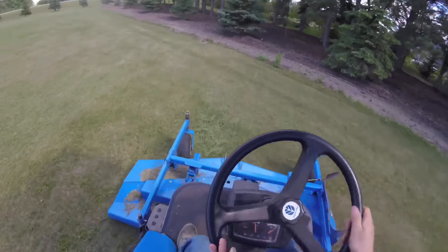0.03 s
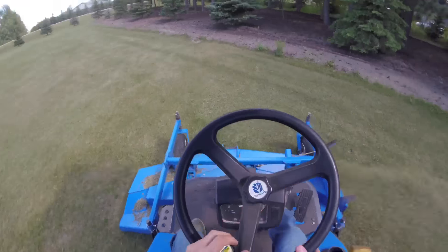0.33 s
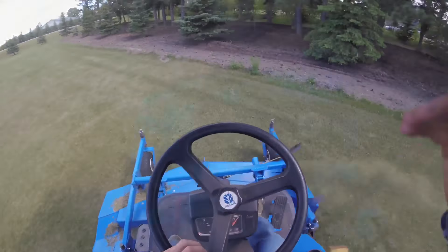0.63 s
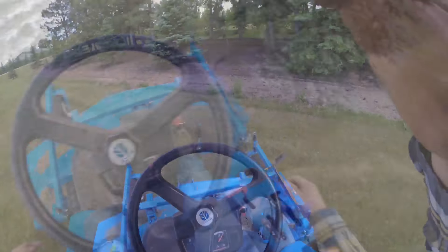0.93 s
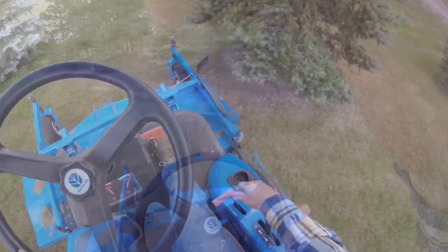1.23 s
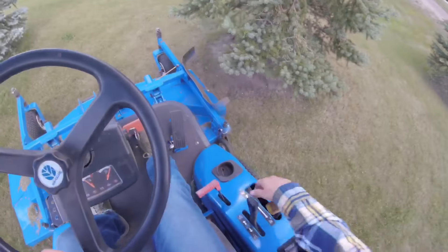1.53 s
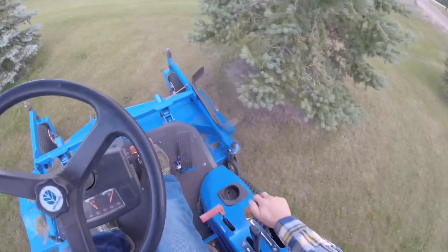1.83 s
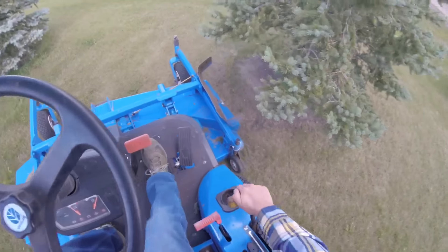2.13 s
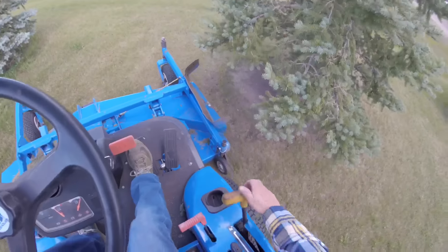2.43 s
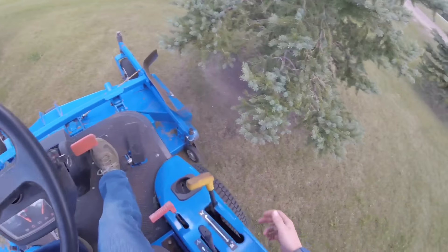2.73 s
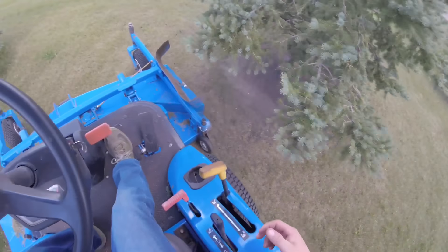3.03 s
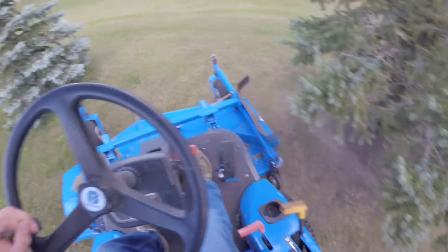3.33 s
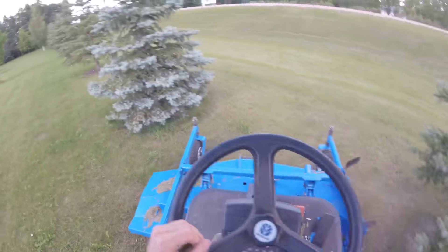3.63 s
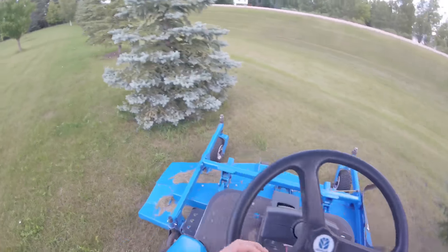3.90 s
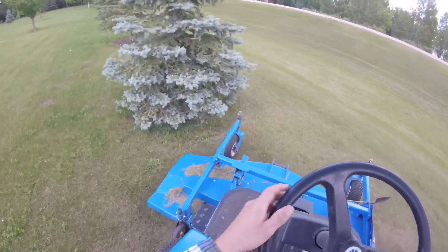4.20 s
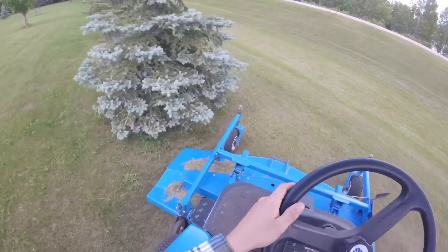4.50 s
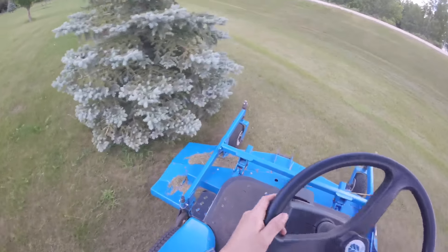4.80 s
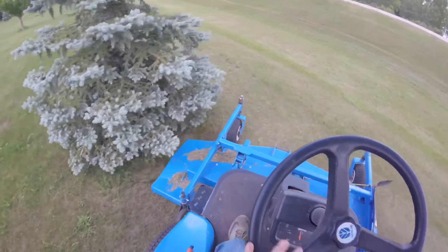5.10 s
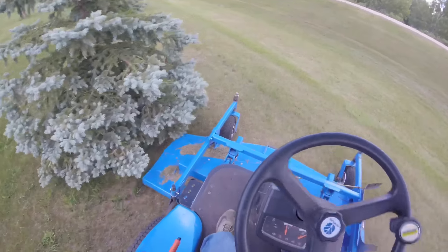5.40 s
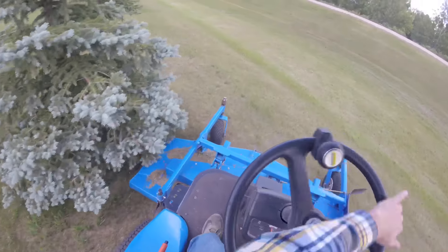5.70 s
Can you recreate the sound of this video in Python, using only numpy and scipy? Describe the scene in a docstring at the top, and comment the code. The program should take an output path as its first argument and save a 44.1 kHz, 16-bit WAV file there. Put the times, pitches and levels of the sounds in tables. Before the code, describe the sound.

A riding mower runs throughout, heard close from the seat outdoors: a low engine drone with clatter, rumble and humming blades. At first grass swishes lightly and a loose guard rattles. A short dry rasp swells near 0.9 seconds, followed by a small metal tick. The blade sound fades out by about 1.5 seconds, leaving the engine running free, boomier and closer. A metal lever clacks at about 1.9 seconds and again, louder, at 2.2. The blades spin up with gear whine, grinding and a thin belt hiss while the engine sags and labours, reaching its lowest note around 2.6 seconds. Loose metal ticks near 3 seconds. By 3.6 seconds the engine is back at speed and drones steadily, the blade hums throbbing against each other. A light grass swish and rattle return from about 5.2 seconds.

```python
"""A three-cylinder riding mower drones and swishes through grass, heard from the seat.
The sound of the mowing deck (the pan that holds the blades) fades out and the engine runs free.
The rider leans over, a lever clacks, and the clutch drags three belt-driven blades up to speed,
so the engine sags, labours and recovers. Its firings make the boom and clatter. The blades turn at
slightly different speeds, so their hums throb against each other over the whine of the gearbox."""
import sys
import numpy as np
from scipy import signal
from scipy.fft import rfft, irfft, next_fast_len
from scipy.io import wavfile
from scipy.ndimage import map_coordinates

SR = 44100
rng = np.random.default_rng(int(sys.argv[2]) if len(sys.argv) > 2 else 0)


def waveform_to_disk(signal):
    """Save audio, clipped to [-1, 1], as 16-bit WAV at the path in sys.argv[1]."""
    frames = np.transpose(np.atleast_2d(signal))
    scaled = np.clip(frames, -1, 1) * 32767
    samples = np.round(scaled).astype(np.int16)
    wavfile.write(sys.argv[1], SR, samples)


N = 253575
ENGAGE_S = 1.97  # the clutch bites
# How fast the blades turn. One number for each blade: its passes per engine firing.
BLADE_PASSES = [1.5, 1.455, 1.402]


def amp(db):
    """Turn decibels into a gain to multiply by."""
    return 10 ** (np.asarray(db) / 20)


def unit(x):
    """Scale x to an average (rms) level of 1."""
    return x / np.sqrt(np.mean(x ** 2) + 1e-20)


def clock():
    """The time of each sample in seconds."""
    return np.arange(N) / SR


def ramp(start, length):
    """Rise evenly from 0 to 1."""
    return np.clip((clock() - start) / length, 0, 1)


def spell(start, end, edge):
    """1 between start and end, 0 outside, with a slope centred on each."""
    return ramp(start - edge / 2, edge) - ramp(end - edge / 2, edge)


def bump(at_s, width_s):
    """Rise smoothly to 1 and fall again, once."""
    return np.exp(-((clock() - at_s) / width_s) ** 2)


def wobble(rate):
    """A smooth curve through `rate` random values a second."""
    points = rng.standard_normal(int(N * rate / SR) + 4)
    return map_coordinates(points, [np.arange(N) * rate / SR])


def filtered(x, response):
    """Scale each frequency in x by the gain that response gives it."""
    size = next_fast_len(N + SR // 2)
    return irfft(rfft(x, size) * response(np.fft.rfftfreq(size, 1 / SR)), size)[:N]


def coloured(x, spectrum):
    """Shape x with a curve of (Hz, dB) points, silent above the last, at level 1."""
    f, db = np.transpose(spectrum)
    return unit(filtered(x, lambda hz: amp(np.interp(np.log(hz + 1), np.log(f), db)) * (hz < f[-1])))


def resonant(x, modes):
    """Make x ring in a few (Hz, width, dB) bands, at level 1."""
    def response(hz):
        return sum(amp(db) / (1 + (2 * (hz - centre) / (1.14 * width)) ** 2)
                   for centre, width, db in modes)
    return unit(filtered(x, response))


def tone(turns):
    """A pure tone of level 1, one wave for each turn."""
    return np.sqrt(2) * np.cos(2 * np.pi * turns)


def pulsing(turns, depth_db):
    """Noise that swells once a turn."""
    return unit(rng.standard_normal(N) * amp(depth_db * np.cos(2 * np.pi * turns)))


def knocks(turns, t60, scatter_db, count=3):
    """One blow a turn on each of count parts in rotation; each ring dies by 60 dB in t60 seconds."""
    at = np.flatnonzero(np.diff(np.floor(turns)) > 0)
    t = np.arange(SR // 10) / SR
    rings = rng.standard_normal((count, len(t))) * amp(-60 * t / t60)
    sizes = amp(scatter_db * rng.standard_normal(N))
    out = np.zeros(N)
    for part, ring in enumerate(rings):
        blows = np.zeros(N)
        blows[at[part::count]] = sizes[at[part::count]]
        out += signal.fftconvolve(blows, ring)[:N]
    return unit(out)


def clack(s, db, centre_hz, t60, octaves):
    """Metal hits metal: a burst of noise around one pitch that dies quickly."""
    age = clock() - s
    burst = rng.standard_normal(N) * (age >= 0) * amp(db - 60 * np.abs(age) / t60)
    return filtered(burst, lambda hz: unit(np.exp(-.5 * (np.log2((hz + 1) / centre_hz) / octaves) ** 2)))


def chassis(running, strain):
    """The mower's body rumbles over the lawn, more with the deck running and under strain."""
    # The rumble's tone. Each row: frequency in Hz, relative level in dB.
    rumble = [(15, -14.5), (30, 4), (60, 0.5), (110, 11), (160, -0.5), (220, 2.5), (300, -14.5), (600, -39),
              (2000, -81)]
    return amp(-27 + 1.8 * running + 2 * strain + wobble(11)) * coloured(rng.standard_normal(N), rumble)


def belt(passes, strain):
    """The belt hisses over its pulleys from the moment it snaps tight, more under strain."""
    # Bands of hiss. Each row: centre in Hz, width in Hz, relative level in dB.
    bands = [(6200, 300, 1), (7650, 400, -1), (9300, 1100, -14.5), (12600, 1200, -14.5)]
    tight = ramp(start=2.22, length=.03)
    hiss = resonant(pulsing(passes, depth_db=1), bands)
    return amp(-50.5 + wobble(40)) * tight * strain ** .7 * hiss


def grass(passes, running):
    """Thick grass swishes through the blades and sets the loose guard rattling."""
    # Thick patches. Each row: start and end in seconds, swish level in dB, added rattle in dB.
    patches = [(-.3, .78, -58, -40), (.78, 1.25, -60, -48), (5.2, 6.2, -58, -47)]
    # The swish's tone. Each row: frequency in Hz, relative level in dB.
    swish_tone = [(3000, -17), (6000, -8), (11200, 3), (11900, -14), (13000, -13), (15000, -21)]
    # How the guard rings. Each row: centre in Hz, width in Hz, relative level in dB.
    guard_rings = [(3000, 410, 0), (3820, 460, 2), (5160, 210, -5), (6130, 650, -7.5), (7600, 500, -24),
                   (10200, 2500, -23.5)]
    swish, rattle = np.zeros(N), amp(-52.5) * running  # thin grass gives only a faint rattle
    for start, end, swish_db, rattle_db in patches:
        thick = spell(start, end, edge=.25)
        swish += amp(swish_db) * thick
        rattle += amp(rattle_db) * thick
    swish *= amp(1.8 * wobble(60)) * coloured(pulsing(passes, depth_db=4), swish_tone)
    rattle *= amp(2.4 * wobble(45)) * resonant(pulsing(passes, depth_db=3.5), guard_rings)
    return swish + rattle


def rasp(firings):
    """A dry rasp swells and fades once, pulsing with the engine."""
    # Bands of the rasp. Each row: centre in Hz, width in Hz, relative level in dB.
    bands = [(1620, 200, 8), (2150, 290, -1), (2900, 500, -11)]
    return amp(-31) * bump(at_s=.91, width_s=.18) * resonant(pulsing(firings, depth_db=2.5), bands)


def loose_metal():
    """Loose metal ticks now and then."""
    # Each row is a tick: start in seconds, level in dB, pitch in Hz, ring time in seconds.
    ticks = [(.54, -50, 13800, .04), (1.13, -33, 3980, 0.045), (2.955, -29.5, 2950, 0.076),
             (4.81, -60, 9000, .027), (5.294, -39, 8300, .032)]
    return sum(clack(s, db, hz, t60, octaves=.11) for s, db, hz, t60 in ticks)


def lever():
    """Each clack of the lever rings the same pitches, favouring the high or the low ones."""
    # Each row is a clack: start in seconds, level in dB, tilt towards the treble in dB per octave.
    hits = [(1.861, -23.5, .5), (2.2215, -17, -1)]
    # How the lever rings. Each row: pitch in Hz, relative level in dB, ring time in seconds.
    rings = [(1150, -2, .09), (1750, -4, .08), (2550, -4, .06), (4300, -8.5, .06), (7000, -19, .07),
             (11000, -33, .11)]
    middle_hz = np.median([hz for hz, _, _ in rings])
    return sum(clack(s, db + ring_db + tilt_db * np.log2(hz / middle_hz), hz, t60, octaves=.28)
               for s, db, tilt_db in hits for hz, ring_db, t60 in rings)


def air_hiss(firings, strain, deck_speed):
    """Air hisses through the fan and the grass, louder with the deck at speed and under strain."""
    # The hiss's tone. Each row: frequency in Hz, relative level in dB.
    hiss_tone = [(2000, -21.5), (4000, 10), (5000, -2.5), (6200, -3), (7700, -2), (9000, -7),
                 (11000, -16.5), (12000, -23), (13300, -22.5), (15000, -26)]
    hiss = pulsing(firings, depth_db=1.5) * amp(wobble(90))
    return amp(-49.5 + 3 * deck_speed + 2.5 * strain) * coloured(hiss, hiss_tone)


def engine_clatter(firings, lean, strain):
    """Each firing knocks the engine block and shakes the frame and the hood."""
    # The tones of frame and block. Each row: frequency in Hz, relative level in dB.
    frame_tone = [(60, -10.5), (200, 6.5), (280, -7.5), (350, -3), (450, -1.5), (570, 0.5), (700, -7),
                  (900, -6), (1200, -17.5), (2000, -31), (4000, -73)]
    block_tone = [(300, -29.5), (700, 0.5), (1050, 6.5), (1300, 7.5), (1600, 5.5), (1900, 4.5), (2400, 1.5),
                  (3000, 0.5), (4000, -5.5), (5000, -11), (7000, -21.5), (14000, -71.5)]
    # How the hood rings. Each row: centre in Hz, width in Hz, relative level in dB.
    hood_rings = [(573, 93, 6), (894, 300, 1.5), (1583, 190, 2.5), (2584, 88, -5.5), (3900, 240, -21)]
    frame = .3 * knocks(firings, t60=.05, scatter_db=1) + pulsing(firings, depth_db=.7)
    block = .5 * knocks(firings, t60=.08, scatter_db=1.2) + pulsing(firings, depth_db=-.5)
    hood = knocks(firings, t60=.086, scatter_db=2) + unit(rng.standard_normal(N))
    return (amp(-27 + 7 * lean + 2 * strain) * coloured(frame, frame_tone)
            + amp(-33 + 7 * strain + .21 * wobble(30)) * coloured(block, block_tone)
            + amp(-35.5 + 4.5 * lean) * resonant(hood, hood_rings))


def exhaust(firings, firing_hz, lean):
    """The muffler smooths the firings into a deep boom, its octave and a few weak, wavering tones."""
    # The weak tones. Each row: multiple of the firing rate, level in dB.
    overtones = [(3, -34), (4, -42.5), (5, -39), (8, -39), (9, -50), (12, -43), (15, -59), (16.5, -47.5)]
    muffler_hz, width_hz = 146, 10
    # Leaning closer, the rider hears the octave swell when it meets the muffler's own pitch.
    in_tune = 1 / (1 + ((2 * firing_hz - muffler_hz) / width_hz) ** 2)
    octave_db = -23.5 + 10 * lean * in_tune
    boom_db = -20.5 + 7.5 * lean - 14 * bump(at_s=.84, width_s=.065)  # the boom dips briefly
    sound = amp(boom_db + .5 * wobble(25)) * tone(firings)
    sound += amp(octave_db + .54 * wobble(25)) * tone(2 * firings - .4)
    for k, db in overtones:
        sound += amp(db + 1.7 * wobble(4.4)) * tone(k * firings + .05 * wobble(14) + rng.random())
    return sound


def gearbox(drive, grip, strain, slip):
    """The drive shaft hums; its gear teeth whine, and chatter while the clutch slips."""
    # The whine's tones. Each row: multiple of the shaft's speed, relative level in dB.
    gear_tones = [(18, -32.5), (19, -29), (20, -34), (21, -42), (22, -40.5), (36, -50), (37, -41.5),
                  (38, -44), (39, -47)]
    shaft = .5467 * drive
    hum = grip ** 3 * (amp(-35) * tone(shaft) + amp(-31) * tone(5 * shaft))
    whine = np.zeros(N)
    for k, db in gear_tones:
        jitter = .045 * wobble(18) + .12 * slip * wobble(60)
        chatter_db = slip * grip * .7 * (k - 18)  # chattering teeth favour the higher tones
        whine += amp(db + chatter_db + 2.5 * wobble(13)) * tone(k * shaft + jitter + rng.random())
    # Louder as the clutch rubs, a little softer when strain presses the teeth together.
    rubbing = grip ** 5 * slip
    return hum + whine * amp(7.5 * rubbing / rubbing.max() - strain)


def blades(drive, speed, strain, slip):
    """Three blades slip differently on one belt, so their hums drift in and out of step."""
    # Each row is one blade's hum: relative levels in dB at 1, 2, 3 and 4 times its pass rate.
    hums = [(-13.5, -24.5, -25.5, -30), (-24.5, -17.5, -33, -41), (-28.5, -32, -32, -38)]
    # The buzz of a blade's axle. Each row: multiple of the pass rate, relative level in dB.
    buzz = [(5, -28.5), (6, -29.5), (7, -45), (8, -33), (10, -42.5), (12, -47)]
    in_step_s = 4.77
    from_in_step = drive - drive[round(in_step_s * SR)]
    overtone_db = -2.5 + 2.5 * (clock() > ENGAGE_S) + 12.5 * slip + 1.5 * strain
    sound, offsets = np.zeros(N), rng.random(len(hums[0]))
    for blade, (ratio, levels) in enumerate(zip(BLADE_PASSES, hums)):
        passes = ratio * from_in_step + .022 * wobble(10)
        for k, db in enumerate(levels, 1):
            gain = amp(db + (k > 2) * overtone_db + wobble(11))
            sound += gain * tone(k * passes + (k > 1) * offsets[k - 1])
        # A straining belt makes the axles buzz, the nearest one most.
        for k, db in buzz:
            gain = strain * amp(db + 2.1 - 1.3 * blade + 3.9 * wobble(12))
            sound += gain * tone(k * passes + .015 * wobble(16) + rng.random())
    return sound * speed ** 2.13


def clutch():
    """The deck's share of the engine's speed (grip) and how much of it is heard (running), both 0-1."""
    fade_start_s, fade_end_s, spin_up_s = .33, 1.55, .635
    grip = (clock() < fade_end_s) + ramp(ENGAGE_S, spin_up_s)
    fade_out = np.cos(np.pi / 2 * ramp(fade_start_s, fade_end_s - fade_start_s)) ** 1.26
    return grip, fade_out + ramp(ENGAGE_S + .087, .15)


def deck(firing_hz, grip, running, strain):
    """The engine drives the deck: the blades stir air in the steel pan and the strained drive grinds."""
    # The tone of air in the pan. Each row: frequency in Hz, relative level in dB.
    pan_tone = [(60, -38.5), (130, 4.5), (215, 5), (300, 2.5), (400, -17.5), (620, -3), (730, 2.5),
                (810, 0.5), (980, -20), (1250, -14), (1470, -9), (1700, -36.5), (4000, -62)]
    # How the drive parts ring. Each row: centre in Hz, width in Hz, relative level in dB.
    drive_rings = [(980, 200, 3.5), (1230, 97, -3), (2000, 83, 1.5), (2220, 120, -5)]
    drive = np.cumsum(firing_hz * grip) / SR  # turning passed on by the clutch, counted in firings
    speed = grip * firing_hz / np.median(firing_hz)
    slip = np.sqrt(np.clip(1 - grip, 0, 1))
    passes = BLADE_PASSES[0] * drive
    air = amp(-20.5) * speed ** 3 * coloured(pulsing(passes, depth_db=2.5), pan_tone)
    grind_gain = strain * grip * amp(-34 + 4.9 * wobble(40))
    grind = grind_gain * resonant(pulsing(passes, depth_db=4), drive_rings)
    turning = blades(drive, speed, strain, slip) + gearbox(drive, grip, strain, slip) + air + grind
    return running * turning + grass(passes, running) + belt(passes, strain)


def panels(x, echo_db, count):
    """Steel panels around the seat return the treble as weak echoes a few milliseconds late."""
    treble = filtered(x, lambda hz: 1 / (1 + (1800 / (hz + 1)) ** 4))
    delays_s = rng.uniform(.002, .014, count)
    echoes = sum(np.pad(treble, (round(s * SR), 0))[:N] for s in delays_s) / np.sqrt(count)
    # The direct treble gives up the energy that the echoes carry.
    return x - treble + (treble + amp(echo_db) * echoes) / np.hypot(1, amp(echo_db))


def scene():
    """Everything turns with the engine; the more it sags with the clutch gripping, the more strain."""
    # The engine's speed. Each row: time in seconds, firings per second.
    engine_speed = [(0, 69.9), (.7, 69.7), (1.2, 72.25), (1.6, 72.4), (1.85, 72), (2.15, 63.1),
                    (2.45, 56.6), (2.62, 53.6), (2.75, 57.6), (3.05, 64.2), (3.35, 68.7), (3.6, 70.7),
                    (5.75, 70.8)]
    firing_hz = np.interp(clock(), *np.transpose(engine_speed))
    firings = np.cumsum(firing_hz) / SR
    grip, running = clutch()
    free_hz, heavy_sag = firing_hz.max(), .13  # losing this share of speed brings most of the strain
    strain = grip * np.tanh((free_hz - firing_hz) / (heavy_sag * free_hz))
    lean = spell(start=1.25, end=3.33, edge=.82)  # the rider leans nearer the engine, then sits back
    engine = exhaust(firings, firing_hz, lean) + engine_clatter(firings, lean, strain)
    engine += air_hiss(firings, strain, grip * running) + rasp(firings)
    mower = engine + deck(firing_hz, grip, running, strain) + chassis(running, strain)
    return (panels(mower, echo_db=-18.5, count=8) + lever() + loose_metal())[None]


def record(dry):
    """Round off the highest peaks and cut the very top of the treble."""
    ceiling, top_hz = .95, 15100
    rounded = dry[0] / (1 + np.abs(dry[0] / ceiling) ** 8) ** (1 / 8)
    return filtered(rounded, lambda hz: hz < top_hz)[None]


dry = scene()
out = record(dry)
waveform_to_disk(out)
```